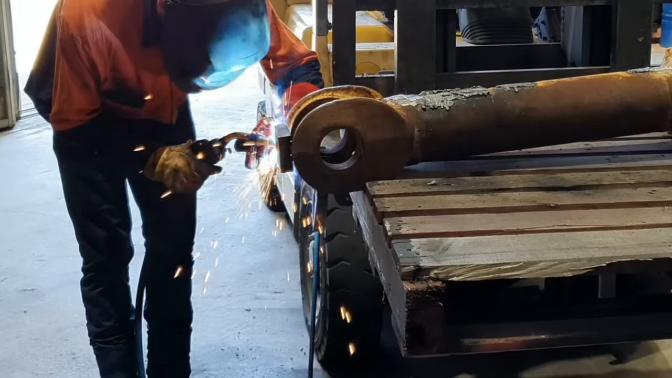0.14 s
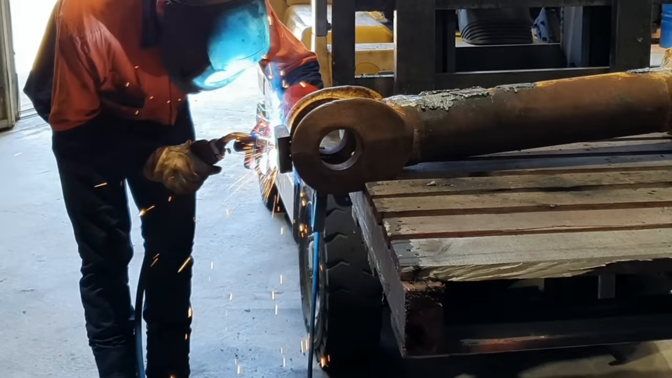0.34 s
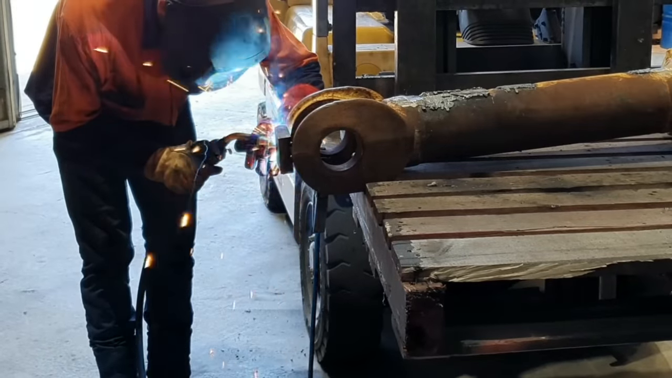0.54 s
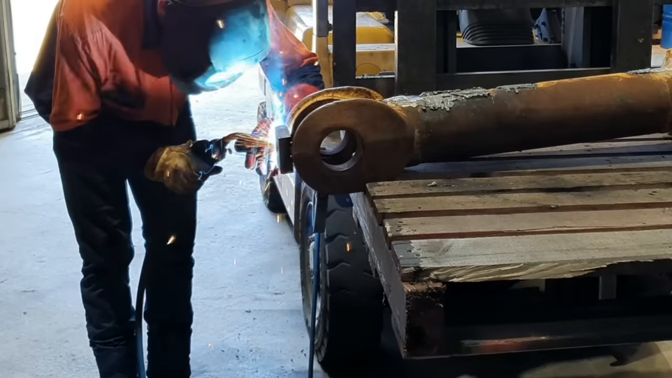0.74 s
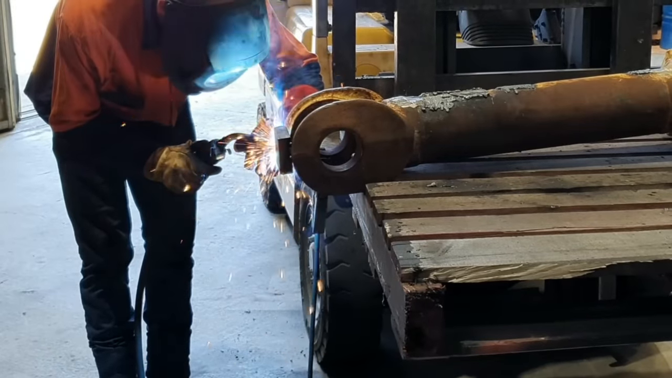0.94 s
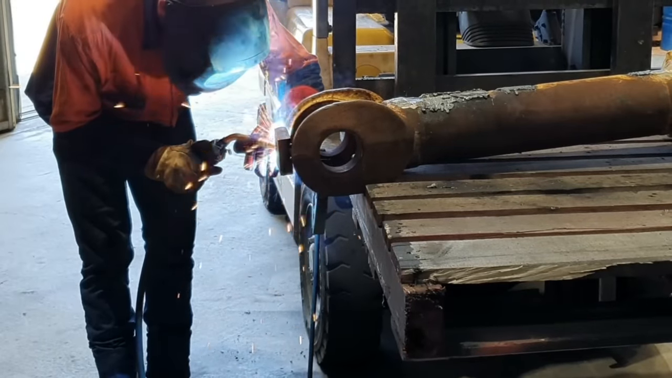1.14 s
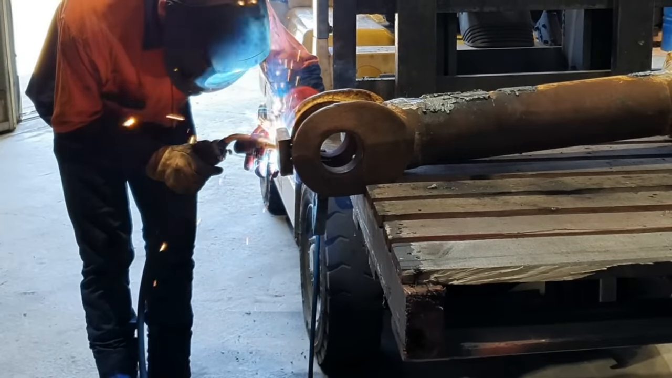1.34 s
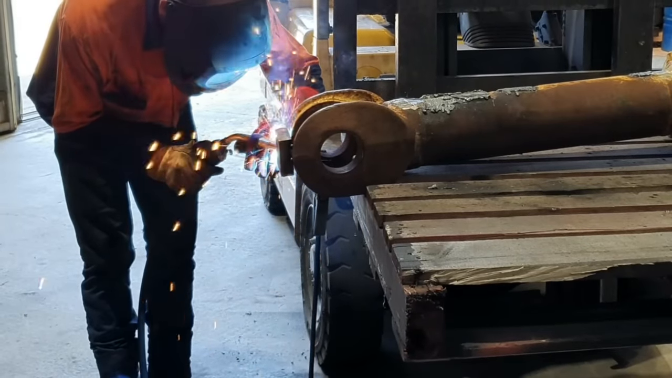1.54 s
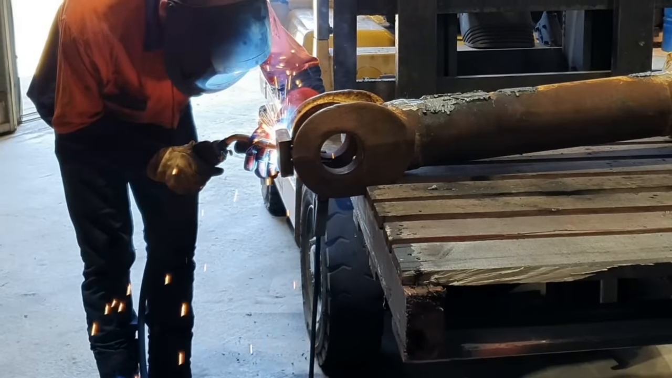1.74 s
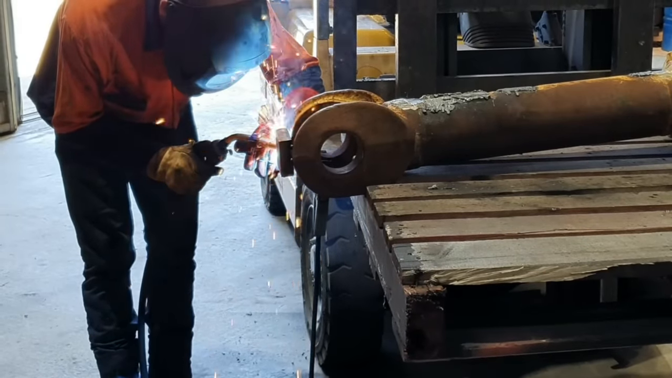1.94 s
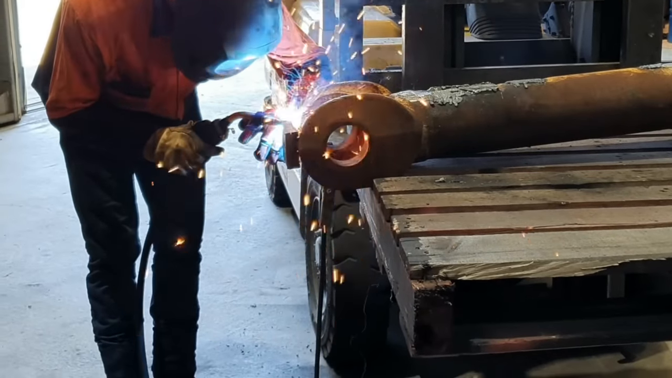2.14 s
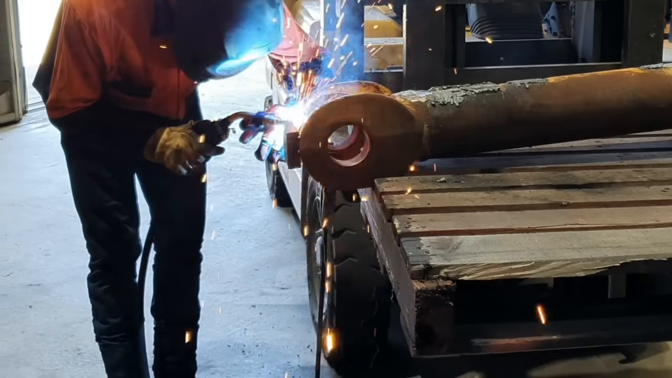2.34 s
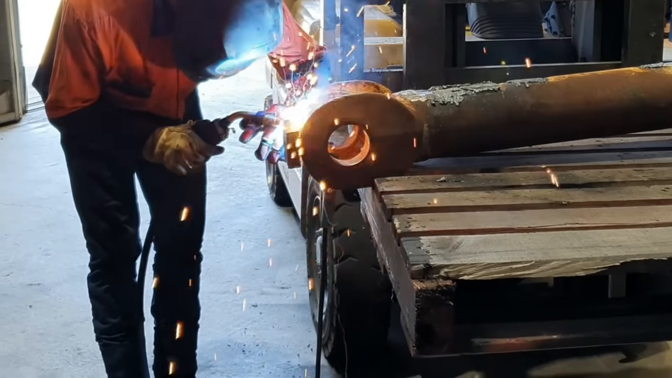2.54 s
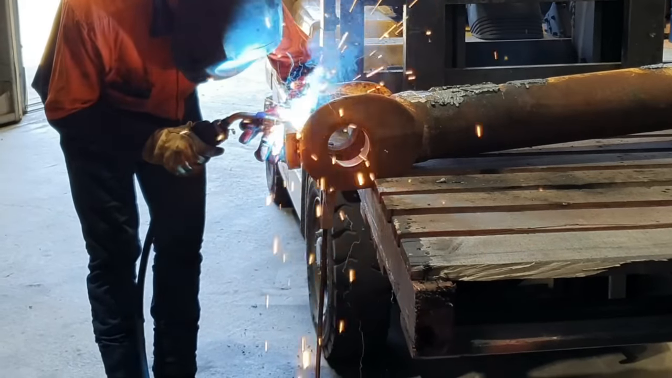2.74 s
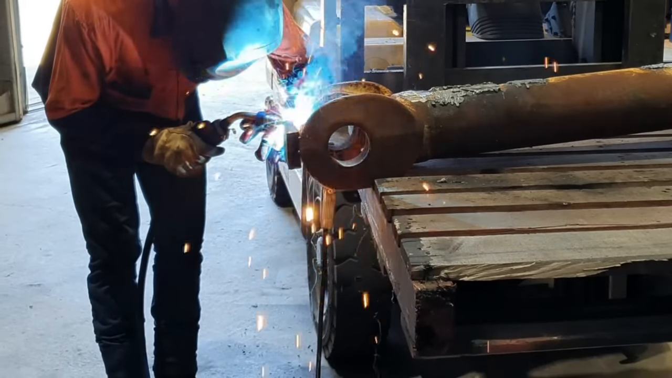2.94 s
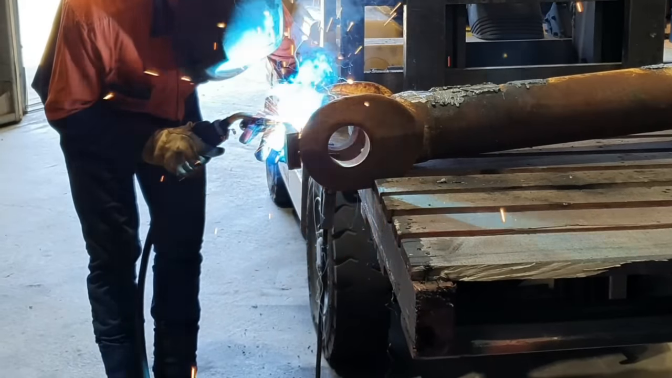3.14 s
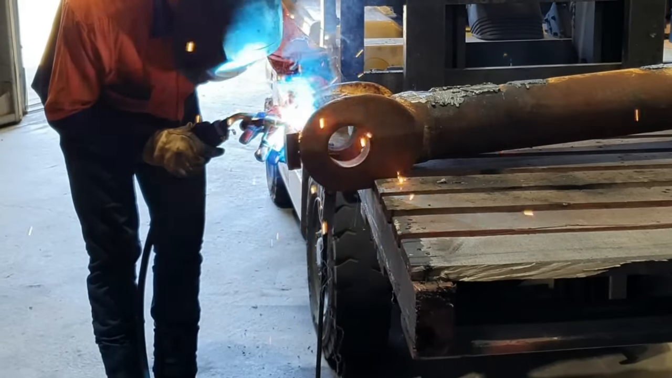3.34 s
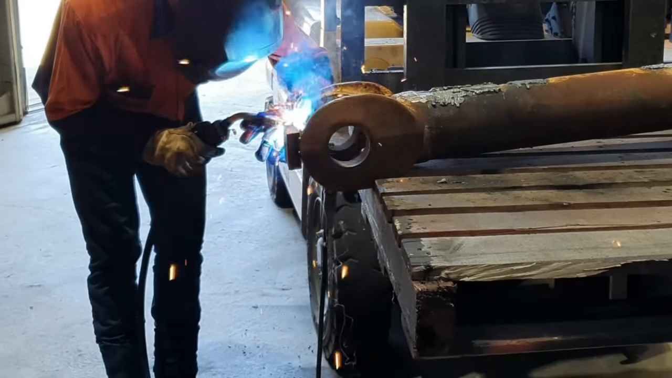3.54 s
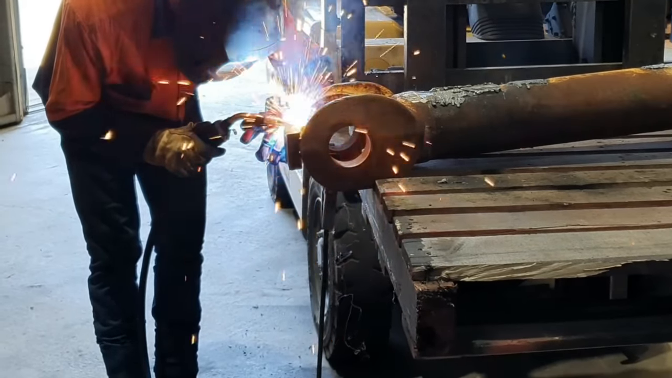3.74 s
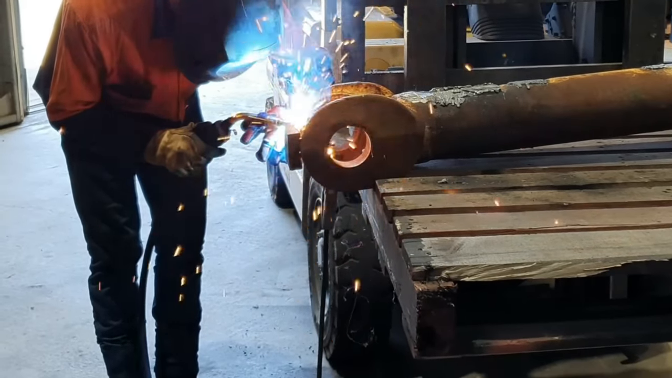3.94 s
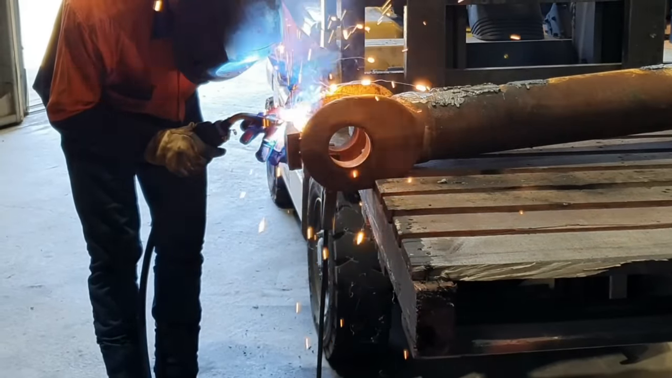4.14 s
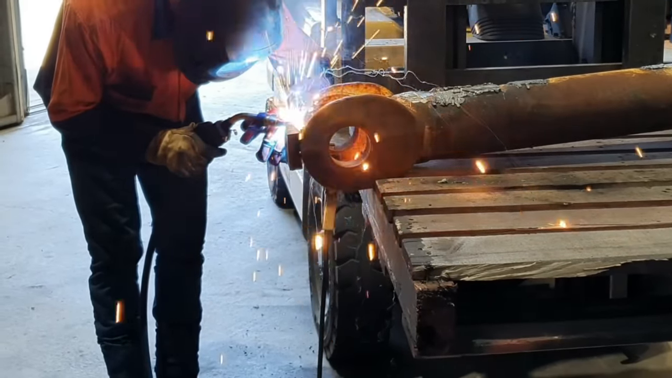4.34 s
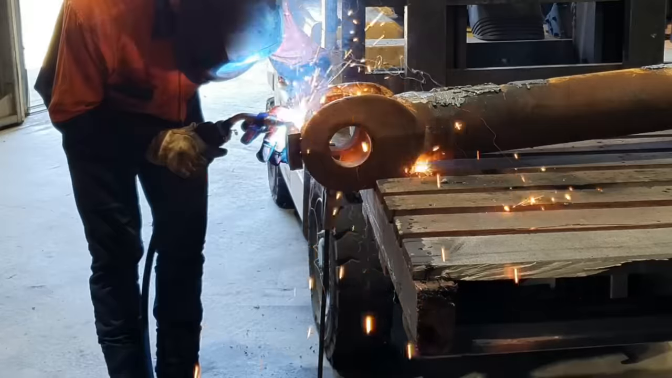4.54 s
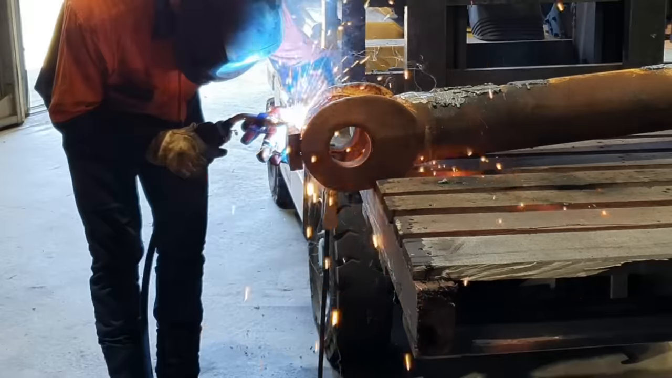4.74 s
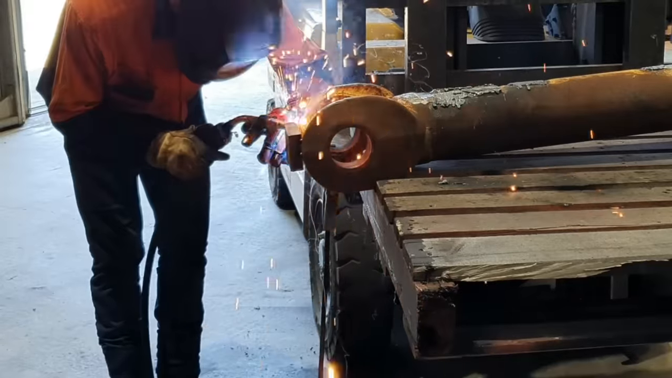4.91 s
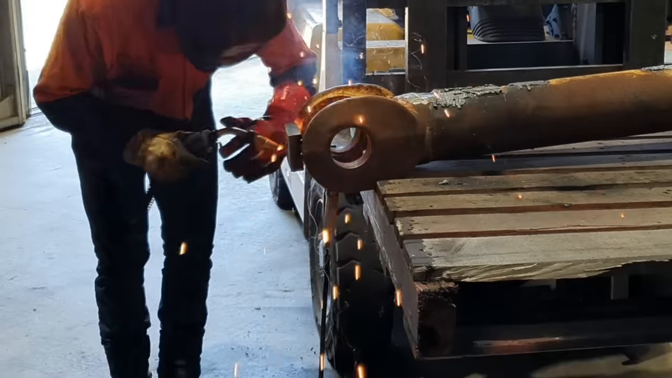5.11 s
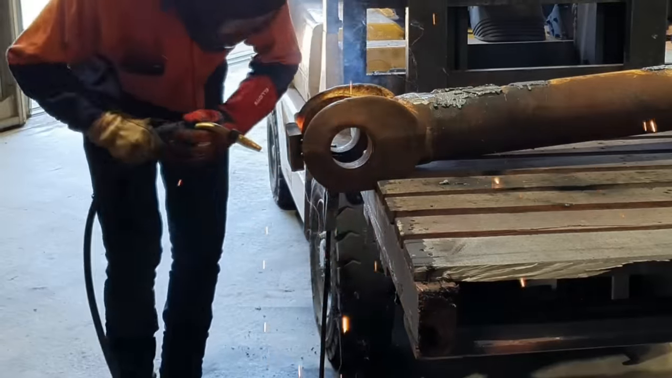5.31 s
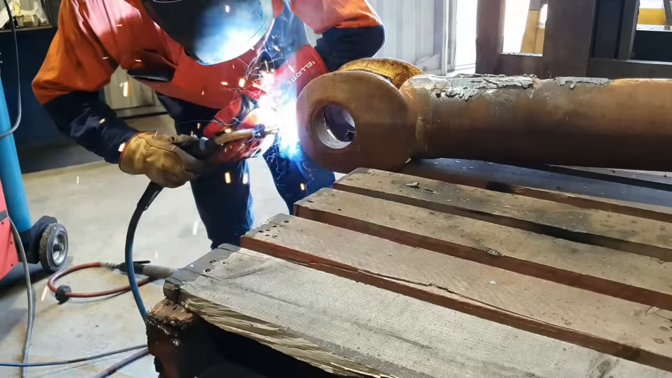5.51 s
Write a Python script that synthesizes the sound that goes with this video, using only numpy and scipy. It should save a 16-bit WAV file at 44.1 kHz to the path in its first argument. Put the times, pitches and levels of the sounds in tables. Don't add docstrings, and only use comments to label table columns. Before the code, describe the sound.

Fast, sharp electric welding crackle with fine sizzle beside a metal arm, a brief pause with low engine drone, then the arc starts again.

```python
import sys
import numpy as np
from scipy import signal
from scipy.fft import rfft, irfft
from scipy.io import wavfile
from scipy.ndimage import uniform_filter1d

SR = 44100
rng = np.random.default_rng(int(sys.argv[2]) if len(sys.argv) > 2 else 0)


def voltage_ratio(decibels):
    exponent = np.asarray(decibels, float) / 20
    return 10 ** exponent


def waveform_to_disk(signal):
    frames = np.transpose(np.atleast_2d(signal))
    scaled = np.clip(frames, -1, 1) * 32767
    samples = np.round(scaled).astype(np.int16)
    wavfile.write(sys.argv[1], SR, samples)


N = 245637

STOP_S, SCENE_CHANGE_S = 4.968, 5.5122

# time in seconds, heat in dB, unrest of the pool in dB.
HEAT = [(0, -27.5, 3.5), (.35, -25, -3), (.62, -32, 2), (.75, -25.5, -2.5), (1.05, -27.5, 2.5),
        (1.4, -26, -3), (1.8, -32, 8.5), (2.2, -24.5, -3), (2.7, -28.5, 3.5), (2.95, -30, 1.5),
        (3.13, -33, 3.5), (3.18, -24, -0.5), (3.58, -28, 0), (3.65, -20.5, -4), (4.02, -25, 1.5),
        (4.25, -24.5, -3), (4.7, -26.5, -1.5), (4.96, -23, 2.5)]
# pitch in Hz, likeness from -1 to 1.
LIKENESS = [(60, 0.94), (180, 1), (550, 0.53), (1650, 0.2), (4970, -0.027), (15000, -0.2)]


def evened(x):
    return x / np.sqrt(np.mean(x ** 2) + 1e-20)


def read(points, hz):
    f, value = np.transpose(points)
    return np.interp(np.log(hz + 1), np.log(f + 1), value)


def pair(left, other, hz):
    same = np.clip(read(LIKENESS, hz), -1, 1)[:, None]
    return np.array([left, same * left + np.sqrt(1 - same ** 2) * other])


def snaps():
    # time in seconds, crack in dB, thump in dB.
    big_hidden = [(0.0583, -11, -35), (0.1476, -9, -35), (0.2613, -13, -33), (0.3247, -11, -36),
                  (0.3731, -10, -35), (0.5736, -11, -37), (0.6384, -11, -34), (0.6898, -10, -36),
                  (0.7956, -9, -37), (0.9009, -9, -32), (1.0834, -9, -35), (1.1209, -10, -35),
                  (1.1528, -9, -36), (1.294, -9, -37), (1.3314, -8, -36), (1.3653, -10, -35),
                  (1.4606, -8, -37), (1.5569, -9, -37), (1.6207, -9, -35), (1.713, -9, -37),
                  (1.7464, -9, -36), (1.8028, -8, -35), (1.8672, -9, -37), (1.933, -10, -38),
                  (1.9674, -9, -36), (2.0004, -9, -35), (2.0348, -11, -35), (2.0951, -8, -34),
                  (2.1605, -8, -34), (2.2084, -8, -36)]
    big_open = [(2.2323, -9, -36), (2.2573, -7, -37), (2.2902, -12, -37), (2.3261, -10, -36),
                (2.3565, -9, -35), (2.381, -8, -35), (2.4224, -8, -37), (2.4478, -11, -35),
                (2.4862, -11, -35), (2.5177, -10, -35), (2.5436, -11, -35), (2.5765, -11, -36),
                (2.6339, -10, -35), (2.6718, -12, -33), (2.6898, -8, -32), (2.8, -13, -37),
                (2.8359, -11, -37), (2.8684, -10, -42), (2.9103, -14, -38), (3.0255, -9, -36),
                (3.0584, -13, -42), (3.1068, -14, -35), (3.1467, -10, -35), (3.1647, -8, -34),
                (3.1976, -12, -37), (3.2295, -14, -36), (3.255, -9, -35), (3.3518, -12, -35),
                (3.452, -8, -35), (3.471, -10, -35)]
    big_settled = [(3.6079, -13, -38), (3.6263, -8, -33), (3.6458, -6, -32), (3.7036, -8, -33),
                   (3.9142, -8, -36), (3.9386, -10, -36), (3.9576, -8, -36), (4.0833, -11, -33),
                   (4.1456, -10, -36), (4.19, -10, -36), (4.213, -5, -37), (4.2329, -9, -34),
                   (4.2554, -8, -36), (4.2788, -7, -36), (4.3023, -9, -36), (4.3367, -8, -35),
                   (4.3731, -9, -36), (4.3921, -9, -37), (4.411, -7, -36), (4.429, -8, -38),
                   (4.4654, -8, -34), (4.5348, -9, -36), (4.5707, -8, -38), (4.5901, -9, -36),
                   (4.6445, -8, -35), (4.663, -9, -36), (4.7104, -7, -35), (4.7842, -8, -38),
                   (4.8026, -10, -36), (4.871, -10, -35)]
    big_relit = [
        (5.4934, -41, -65),
        (5.5400, -10, -38),
        (5.5480, -18, -50),
        (5.5668, -12, -42),
    ]
    # time in seconds, drops per second.
    pace = [(0, 52), (1.3, 58), (2.7, 56), (2.75, 44), (3.6, 44), (3.65, 54), (4.0, 54), (4.1, 46),
            (4.3, 46), (4.35, 53), (4.8, 55), (4.9, 105)]
    usual_pace = 54
    jitter = .11

    big = np.r_[big_hidden, big_open, big_settled, big_relit] + [0, -4.5, 38.5]
    edges = np.r_[0, big[big[:, 0] < STOP_S, 0], STOP_S]
    gaps = np.diff(edges)
    gap_pace = np.interp(edges[:-1] + gaps / 2, *np.transpose(pace))
    counts = np.maximum(np.round(gaps * gap_pace), 1)
    slot = np.arange(1, 16)
    late, strong, heavy = rng.standard_normal((3, len(gaps), len(slot)))
    dud = rng.random(late.shape) < .1
    s = edges[:-1, None] + (gaps / counts)[:, None] * (slot + jitter * np.clip(late, -2, 2))

    hurry = np.maximum(np.interp(s, *np.transpose(pace)) / usual_pace, 1)
    over_db = 1.8 * np.clip(strong, -3, 1) - 20 * np.log10(hurry)
    heat_db = np.interp(s, *np.transpose(HEAT)[:2])
    crack_db = heat_db + 8 + over_db
    thump_db = over_db + 1.5 * heavy - 11 * dud + .5 * (heat_db + 28.5) + 1.5
    used = slot < counts[:, None]
    return np.c_[big.T, [s[used], crack_db[used], thump_db[used]]]


def sizzle(per_s=3000):
    # time in seconds, level in dB.
    relit = [
        (5.5122, -20),
        (5.522, -25),
        (5.537, -30),
        (5.545, -33),
        (5.564, -32),
    ]
    t = np.arange(N) / SR
    when, heat_db, unrest_db = np.transpose(HEAT)
    pool_db = -24.5 + np.interp(t, when, 0.9 * (heat_db + 30.5) + unrest_db) - t
    first_run = voltage_ratio(pool_db) * (t < STOP_S)
    second_run = voltage_ratio(np.interp(t, *np.transpose(relit))) * (t >= SCENE_CHANGE_S)
    draw = rng.random(N)
    size = np.minimum(rng.exponential(1, N), 5)
    spits = evened(voltage_ratio(2.5 * size) * (draw < per_s / SR))
    return (first_run + second_run) * spits * voltage_ratio(2.0)


def arc(thump_db=7.0, crack_db=27):
    s, crack_rel, thump_rel = snaps()
    at = np.round(s * SR).astype(int) + 20
    thump, crack = np.zeros((2, N))
    crack[at] = voltage_ratio(crack_rel + crack_db)
    thump[at] = voltage_ratio(thump_rel + thump_db)
    spatter = sizzle()
    return thump + voltage_ratio(-5) * spatter, crack + spatter


def echoes(table):
    hz = np.fft.rfftfreq(1024, 1 / SR)
    rows = np.transpose(table)[..., None]
    delay_s = rows[:2] / 1000 + 128 / SR
    return np.exp(-2j * np.pi * hz * delay_s) * voltage_ratio(rows[2:])


def paths(low_table, high_table, thump, crack, split_hz=4500):
    # left, then right, in ms.
    smear_ms = [.075, .13]
    low = 1 / (1 + (np.fft.rfftfreq(1024, 1 / SR) / split_hz) ** 4)
    heard = signal.oaconvolve(thump[None], irfft(echoes(low_table).sum(1) * low), axes=1)
    age = np.arange(64) * 1000 / SR / np.array(smear_ms)[:, None, None]
    fade = age * np.exp(-age)
    pattern = rng.integers(0, 10, N)
    for k in range(10):
        burst = fade * rng.choice([-1., 1.], (2, len(high_table), 64))
        burst /= np.linalg.norm(burst, axis=2, keepdims=True)
        highs = irfft((echoes(high_table) * rfft(burst, 1024)).sum(1) * (1 - low))
        heard += signal.oaconvolve((crack * (pattern == k))[None], highs, axes=1)
    return heard[:, 128:N + 128]


def ring(start_ms, early_db, early_ms):
    # pitch in Hz, time to fall by 60 dB in seconds.
    ring_time = [(300, .7), (1000, .75), (3000, .8), (8000, .76), (12000, .62), (15000, .48)]
    taps = np.zeros((2, SR))
    at = np.arange(0, SR - 12, 12) + rng.integers(0, 12, (2, (SR - 1) // 12))
    np.put_along_axis(taps, at, rng.choice([-1., 1.], at.shape), 1)
    hz, t, (left, other) = signal.stft(taps, SR, nperseg=256)
    decay = voltage_ratio(-60 * t / read(ring_time, hz)[:, None])
    tail = signal.istft(pair(left, other, hz) * decay, SR, nperseg=256)[1]
    ms = np.arange(tail.shape[1]) * 1000 / SR - start_ms
    tail *= np.clip(ms, 0, 1) * voltage_ratio(early_db * np.exp(-np.maximum(ms, 0) / early_ms))
    return tail / np.linalg.norm(tail[0])


def shed(thump, crack, thump_db=-3, split_hz=4000):
    low = signal.firwin(63, split_hz, fs=SR)
    x = crack + signal.oaconvolve(voltage_ratio(thump_db) * thump - crack, low, "same")
    turn = 2 * np.pi * 2.3 * np.arange(N) / SR
    heard = np.zeros((2, N))
    for k in range(3):
        share = np.sqrt(2 / 3) * np.cos(turn + k * np.pi / 3)
        tail = ring(start_ms=4.5, early_db=6.5, early_ms=9)
        heard += signal.fftconvolve((x * share)[None], tail, axes=1)[:, :N]
    return heard


def causal(db):
    log_gain = np.log(voltage_ratio(np.r_[db, db[-2:0:-1]]))
    return np.fft.ifft(np.exp(np.conj(signal.hilbert(log_gain)))).real[:1024]


def microphone(heard):
    # pitch in Hz, level in dB.
    snap_colour = [(150, -32), (480, -20.5), (650, -11.5), (1000, -16.5), (2200, -10.5), (4000, -11.5),
                   (6200, -16), (7500, -8.5), (9500, -11.5), (12300, -4), (13200, -7), (15200, 0),
                   (15750, -1.5)]
    # pitch in Hz, left minus right in dB.
    port_gap = [(300, .5), (700, 1.5), (1300, -2.5), (2400, -3.5), (4400, -3.5), (8100, 3.5), (12000, 1),
                (15000, -.5)]
    hz = np.fft.rfftfreq(2048, 1 / SR)
    colour = np.array([causal(read(snap_colour, hz) + side * read(port_gap, hz) / 2) for side in (1, -1)])
    return signal.oaconvolve(heard, colour, axes=1)[:, :N]


def drone():
    # middle of the swell in seconds, level in dB, half length in seconds, pitch in Hz.
    swells = [(0.397, -58, 0.24, 56.3), (0.644, -50, 0.16, 61.8), (0.853, -43, .09, 62.6),
              (1.06, -51, 0.11, 56.4), (1.561, -42, 0.36, 60.2), (1.858, -45, 0.13, 55.5),
              (2.091, -55, 0.073, 56.6), (2.27, -36, 0.088, 55.9), (2.582, -32, 0.18, 63.2),
              (2.82, -40, 0.083, 59.1), (3.04, -32.5, 0.18, 62.5), (3.283, -29, 0.12, 60),
              (3.605, -31.5, 0.11, 61), (3.8, -32, 0.32, 59), (4.096, -30, 0.047, 54.5),
              (4.239, -27.5, .11, 60.8), (4.455, -30.5, 0.13, 58.1), (4.647, -32.5, 0.18, 63),
              (4.92, -26, 0.092, 60.5), (5.08, -27.5, 0.13, 57), (5.25, -31, 0.26, 56.9)]
    t = np.arange(N) / SR
    middle_s, _, _, pitch_hz = np.transpose(swells)
    swell = np.zeros(N)
    for at, db, half, _ in swells:
        swell += voltage_ratio(db - 6.5) * np.cos(np.clip((t - at) / half, -1, 1) * np.pi / 2) ** 2
    waver_hz = 1.85 * evened(uniform_filter1d(rng.standard_normal(N), size=2000))
    turns = np.cumsum(np.interp(t, middle_s, pitch_hz) + waver_hz) / SR
    return swell * (np.sin(2 * np.pi * turns) + voltage_ratio(-16.5) * np.sin(4 * np.pi * turns))


def noise(spectrum, patchy_db):
    hz = np.fft.rfftfreq(2048, 1 / SR)
    a, b, c, d, patches = rng.standard_normal((N // 512 + 5, 1025, 5)).T
    patches = uniform_filter1d(patches, size=10, axis=0)
    patches = evened(uniform_filter1d(patches, size=6, axis=1))
    z = pair(a + 1j * b, c + 1j * d, hz)
    z *= voltage_ratio(read(spectrum, hz)[:, None] + patchy_db * patches)
    return evened(signal.istft(z, nperseg=2048, noverlap=1536)[1][:, :N])


def shop_air():
    # pitch in Hz, level in dB per Hz.
    air_colour = [(28, -55), (45, -9), (110, -10.5), (150, -22.5), (230, -11.5), (340, -18), (480, -25),
                  (800, -25), (1400, -23), (2500, -24), (3500, -31), (16000, -49)]
    # time in seconds, level in dB.
    air_level = [(0, -53.5), (1, -50), (2, -52), (3.3, -45.5), (4.2, -47.5), (4.8, -46.5), (5.2, -44),
                 (5.5, -43.5)]
    t = np.arange(N) / SR
    return voltage_ratio(np.interp(t, *np.transpose(air_level)) + 5.0) * noise(air_colour, patchy_db=2.0)


def hum(pitch_hz=400.2, level_db=-60):
    t = np.arange(N) / SR
    return voltage_ratio(level_db) * np.sin(2 * np.pi * pitch_hz * t + 3.95 * np.sin(2 * np.pi * 1.3 * t))


def background():
    t = np.arange(N) / SR
    drop = np.clip((SCENE_CHANGE_S + 0.005 - t) / 0.0029, voltage_ratio(-13.0), 1)
    return (drone() + shop_air() + hum()) * drop


def scene():
    thump_hidden = [(0, .09, -5, -2), (1.3, 1.4, -19, -19), (2.75, 2.82, -5, -3), (3.75, 3.17, -13, -8),
                    (4.7, 4.2, -14, -10)]
    thump_open = [(0, .1, -2, 0), (1.2, 1.2, -16, -18), (3.0, 3.07, -5, -3.5), (3.75, 3.62, -12, -10),
                  (4.8, 4.2, -14, -12)]
    crack_hidden = [(.05, .3, -8, -4), (.5, .55, -10, -1), (1.1, 1.25, -5, -2), (2.85, 2.95, -2.5, -.5),
                    (3.85, 3.6, -10, -8), (4.2, 4.2, -11, -6)]
    crack_open = [(.05, .15, -5, -4), (.45, .55, -4, 0), (1.1, 1.15, -7, -3), (3.0, 3.05, -11, -13),
                  (3.3, 3.35, -10, -9), (3.95, 3.95, -7, -5), (4.6, 4.6, -13, -9)]
    second_view = [(.05, .2, -5, -3), (.5, .6, -2, 0), (.9, 1.0, -6, -4), (4.0, 4.1, -12, -10)]
    views = [(thump_hidden, crack_hidden), (thump_open, crack_open), (second_view, second_view)]

    thump, crack = arc()
    view = np.searchsorted([2.22, 5.49], np.arange(N) / SR)
    near = np.zeros((2, N))
    for k, (low, high) in enumerate(views):
        near += paths(low, high, thump * (view == k), crack * (view == k))
    heard = near + voltage_ratio(-.2) * shed(thump, crack)
    return microphone(heard) + background()


def low_pass(x):
    return signal.sosfilt(signal.butter(12, 17090, fs=SR, output="sos"), x)


def record(dry):
    rounded = np.tanh(dry / 1.4) * 1.4
    return low_pass(rounded)


dry = scene()
out = record(dry)
waveform_to_disk(out)
```